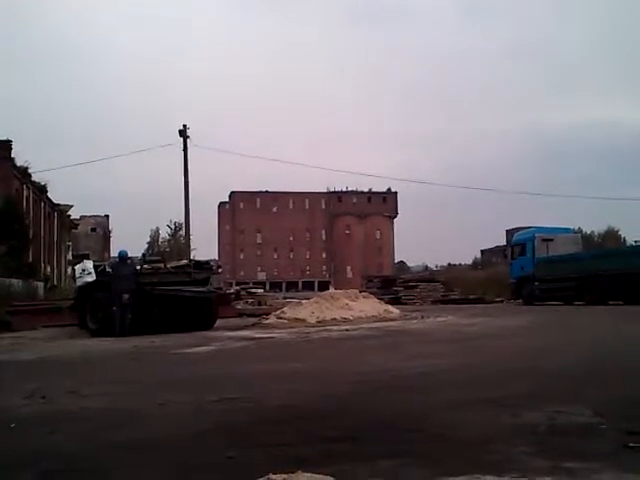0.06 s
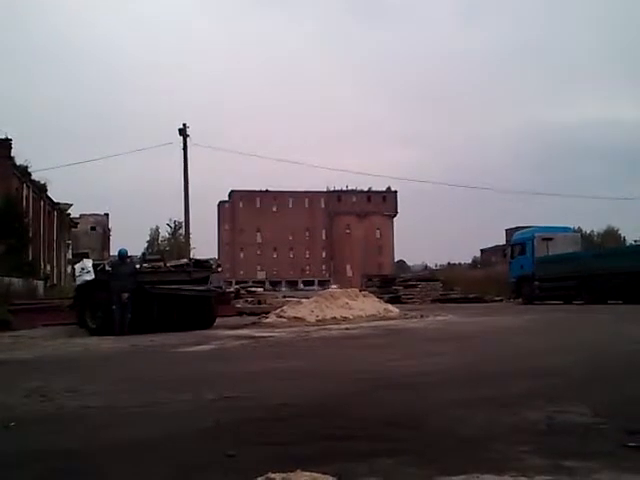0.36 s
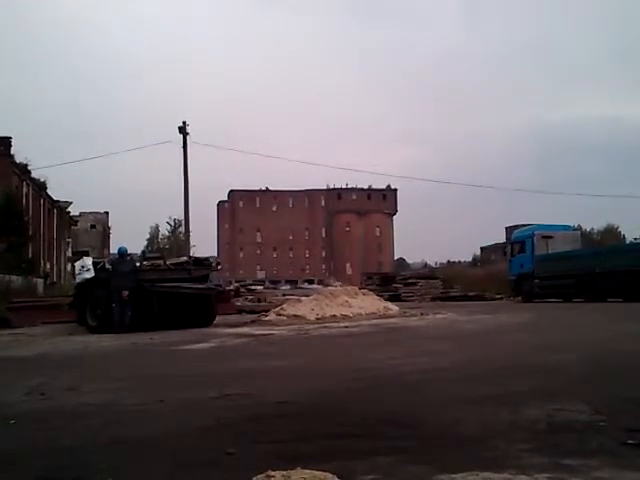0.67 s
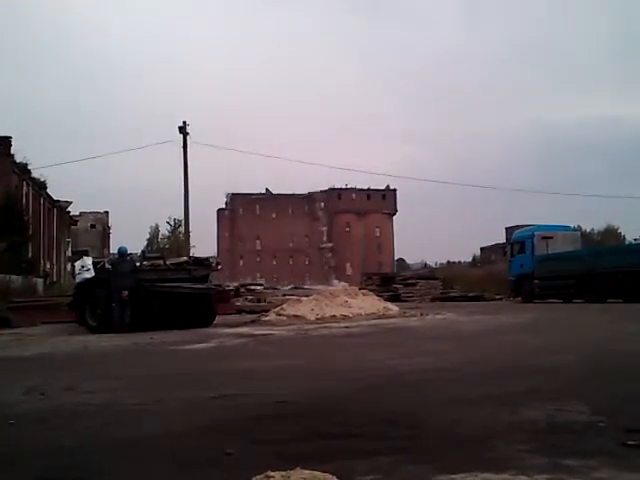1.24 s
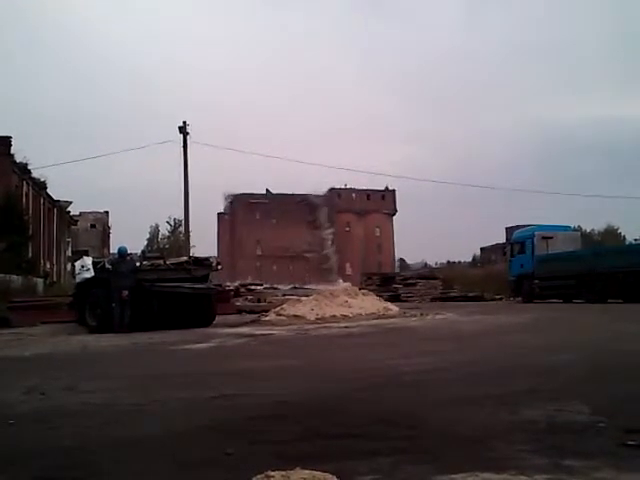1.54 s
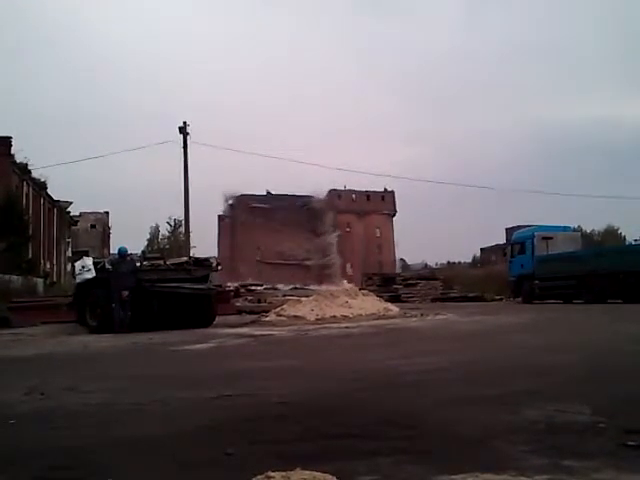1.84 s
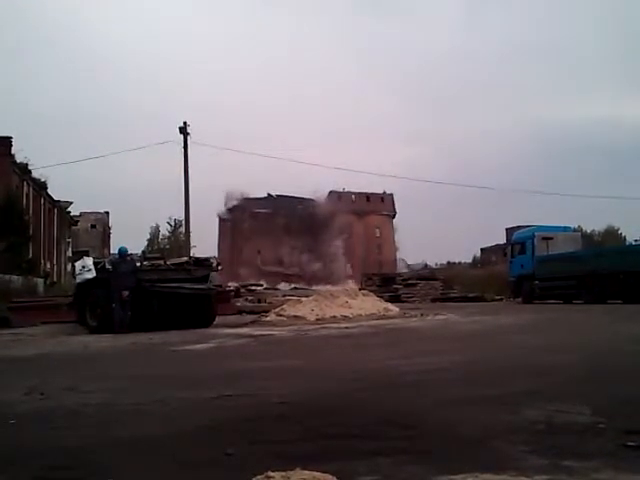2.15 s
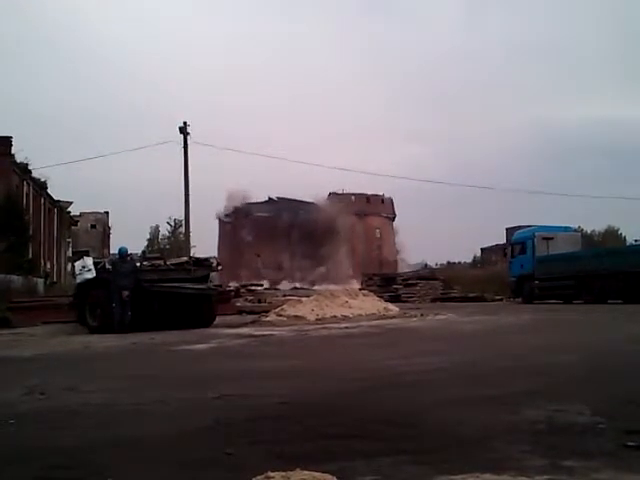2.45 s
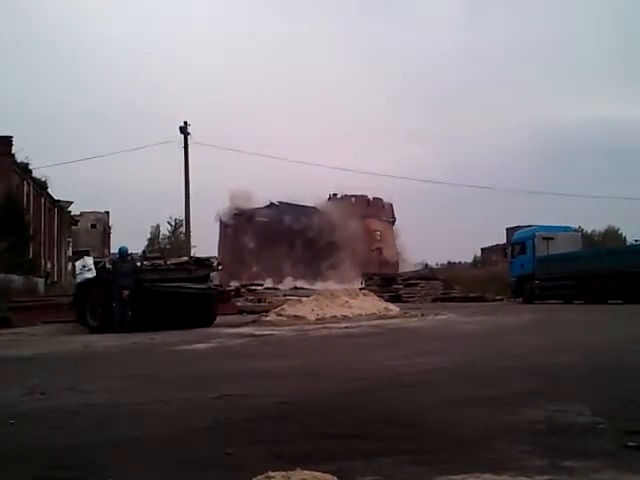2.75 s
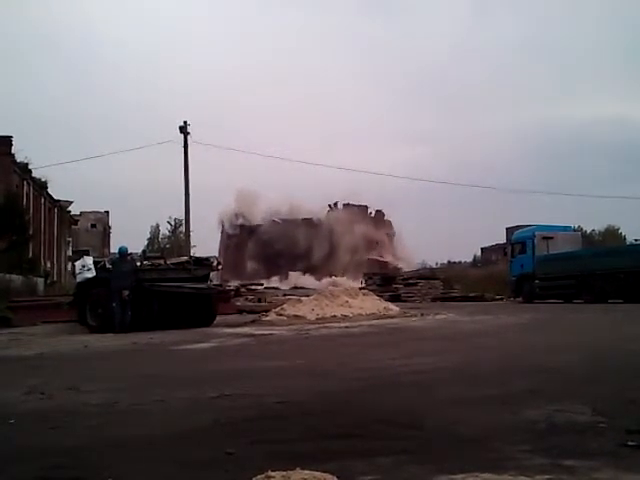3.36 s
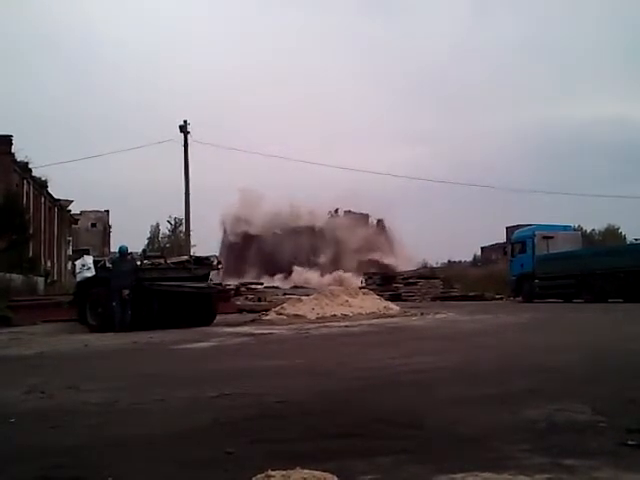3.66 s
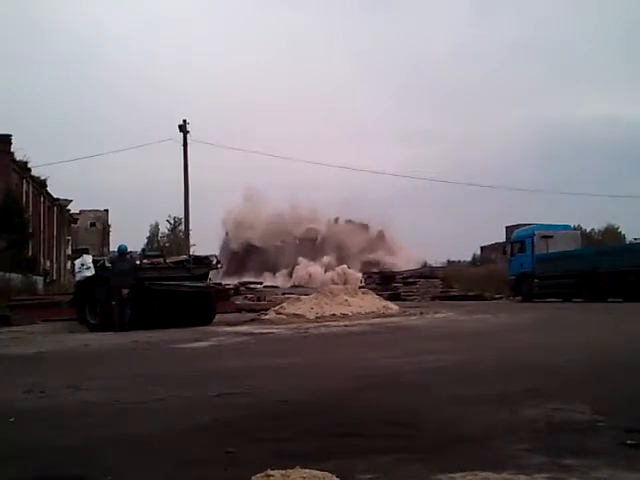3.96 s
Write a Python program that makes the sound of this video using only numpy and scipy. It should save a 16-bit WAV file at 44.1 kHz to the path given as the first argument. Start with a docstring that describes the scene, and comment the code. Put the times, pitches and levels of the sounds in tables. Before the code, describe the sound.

Explosives demolish a brick building in an open yard. Small charges crack and echo, louder blasts boom, then the walls fall with a deep rumble and heavy thumps, giving way to hissing, clattering rubble.

```python
"""Explosives bring down a brick building in an open industrial yard. Small charges crack and echo round
the sheds, two main charges boom, and the masonry falls in a rumble of heavy thumps and a growing hiss
of rubble. Cracks and debris are showers of tiny impacts, booms and thuds are damped low swings, and
echo and rumble are shaped noise. Low air and a hum lie underneath. Two small microphones hear it all
directly and once more off a hard surface close by, ducking on the loudest hits."""
import sys
import numpy as np
from scipy import signal
from scipy.fft import rfft, irfft, next_fast_len
from scipy.io import wavfile
from scipy.ndimage import map_coordinates

SR = 44100
rng = np.random.default_rng(int(sys.argv[2]) if len(sys.argv) > 2 else 0)


def log_audio(samples):
    """Write samples as a 16-bit WAV file to the path given in sys.argv[1]."""
    # one column per channel
    frames = np.atleast_2d(samples).T
    # limit to full scale, then quantise
    limited = np.clip(frames, -1, 1)
    pcm = np.round(limited * 32767).astype(np.int16)
    wavfile.write(sys.argv[1], SR, pcm)


N = 176400

# shocks of the main charges and the first heavy break:
# (time [s], crack [dB], length [s], attack [s], brightness [dB/octave], push [dB], boom [dB])
BLASTS = [(0.953, -18.5, 0.013, 0.0036, 5, -0.5, -21), (0.971, -16.5, 0.0061, 0.0013, 2.5, -7.5, -10.5),
          (1.028, -15, 0.0033, 0.00091, 2.5, -3.5, -8.5), (1.043, -16.5, 0.007, 0.0043, 1.5, -6.5, -8),
          (1.353, -16, 0.0078, 0.0085, -0.9, -6, -9.5)]
# small charges: (time [s], level [dB], length [s], attack [s], brightness [dB/octave])
SMALL_CHARGES = [(0.336, -44.5, 0.05, 0.0017, 3.5), (0.37, -30.5, 0.057, 0.0011, 1),
                 (0.426, -28, 0.0042, 0.0048, 2.5), (0.442, -26, 0.012, 0.0034, 4),
                 (0.456, -17, 0.016, 0.0017, 0.8), (0.521, -19.5, 0.008, 0.0012, 2.3),
                 (0.68, -30, 0.018, 0.011, 2.5), (0.795, -26, .003, 0.00074, -1),
                 (0.844, -29, 0.04, 0.025, 1), (0.921, -26, 0.019, 0.0054, 0.3)]
# tone of a crack: (frequency [Hz], level [dB])
CRACK_EQ = [(40, -10), (180, 5), (330, 9), (550, 2), (1100, 2), (1700, -4.5), (2600, -8), (4300, -14.5),
            (5200, -19), (7300, -29)]
# body of the yard echo: (frequency [Hz], level [dB])
ECHO_BASS_EQ = [(40, -13.5), (190, 6), (330, 2.5), (550, -1.5), (1100, -3.5), (2000, -12.5), (4000, -28.5),
                (6000, -70)]
# bright part of the echo: (frequency [Hz], level [dB])
ECHO_TREBLE_EQ = [(600, -13.5), (1200, 9.5), (2500, 5.5), (4400, 4), (5000, 1.5), (5700, -55),
                  (6500, -63.5)]
# sizzle on top of the echo: (frequency [Hz], level [dB])
ECHO_FIZZ_EQ = [(3500, -32), (5200, 35), (6200, 19.5), (7300, -42)]

# weight of the collapse: (time [s], rumble [dB], thumps [dB])
FALL_FADERS = [(1.0, -20, -12.5), (1.15, -11, -21), (1.3, -16.5, -15), (1.48, -15, -16), (1.7, -16, -14),
               (1.95, -17.5, -16), (2.17, -20.5, -18.5), (2.3, -16, -23.5), (2.42, -24, -23),
               (2.65, -26.5, -29), (3.2, -29, -27.5), (3.75, -28, -28), (4, -33.5, -29.5)]
# breaking masonry: (time [s], level [dB])
CRUSH_FADER = [(1.0, -36), (1.27, -29), (1.38, -22.5), (1.45, -26.5), (1.8, -28), (2.13, -32.5),
               (2.25, -36), (2.8, -39), (3.8, -36), (4, -38)]
# pouring rubble: (time [s], level [dB])
POUR_FADER = [(1.0, -46.5), (1.45, -42), (1.7, -60), (2.0, -47.5), (2.25, -42.5), (2.5, -40), (3.0, -37.5),
              (3.5, -38), (4, -38.5)]
# fine grit: (time [s], level [dB])
GRIT_FADER = [(1.0, -76), (1.75, -99.5), (2.25, -72), (2.47, -50), (2.72, -56.5), (2.97, -47.5),
              (3.5, -56.5), (4, -52)]
# rumble of falling walls: (frequency [Hz], level [dB])
RUMBLE_EQ = [(10, -6.5), (20, 2), (29, 4.5), (42, -3.5), (60, 1), (90, -8.5), (130, -7.5), (300, -111.5)]
# thump of blocks: (frequency [Hz], level [dB])
BLOCK_EQ = [(60, -6.5), (110, -7), (145, -2), (190, -2.5), (240, -5), (310, -12.5), (420, -23.5),
            (900, -105)]
# crunch of bricks: (frequency [Hz], level [dB])
BRICK_EQ = [(150, -19), (330, 3), (560, -4), (800, -6), (1100, -9.5), (1600, -15), (2600, -22),
            (4300, -25.5), (5300, -62.5), (7000, -73.5)]
# hiss of rubble chips: (frequency [Hz], level [dB])
CHIP_EQ = [(200, -15.5), (600, 1), (1100, 0.5), (2000, 2), (2900, 1), (3600, -2), (4450, 0.5), (4900, -4),
           (5600, -15.5), (6300, -46.5)]
# clatter of stones: (frequency [Hz], level [dB])
STONE_EQ = [(500, -21.5), (850, -16), (1050, 6), (1350, -8.5), (1650, 4), (1880, -11), (2060, 4.5),
            (2300, -19), (2520, 6), (2750, -15.5), (3050, 2), (3700, -15), (4250, 0.5), (4800, -23.5),
            (6000, -42)]
# sizzle of grit: (frequency [Hz], level [dB])
GRIT_EQ = [(3500, -29.5), (5000, 6), (5800, 4.5), (6500, 2), (7300, -12.5)]
# buried charges and landing walls: (time [s], level [dB], pitch [Hz])
THUDS = [(0.155, -29.5, 130.4), (0.253, -29, 55), (0.449, -19.5, 61.7), (.468, -22, 201.2),
         (0.691, -23, 162.7), (1.196, -11.5, 206.2), (1.274, -11, 186.7), (1.345, -12, 234.5),
         (1.371, -14, 168.3), (1.403, 1.5, 35.3), (1.493, -7, 178.4), (1.511, -14, 30),
         (1.618, -4.5, 190.3), (1.725, -13.5, 151), (1.889, -12, 143.7), (2.054, -15, 170),
         (2.186, -16, 189.8), (2.285, -9, 48.6), (2.486, -18, 152), (2.731, -20.5, 191),
         (3.629, -20.5, 174.4), (3.74, -20.5, 166.3), (3.82, -23, 147)]
# loads of bricks hitting the heap: (time [s], level [dB], time to peak [s])
SPILLS = [(2.535, -41, 0.017), (2.91, -43, 0.055), (3.125, -38.5, .04), (3.41, -43, 0.038),
          (3.65, -43.5, 0.058), (3.81, -39.5, 0.024)]
# ring of spilling bricks: (frequency [Hz], level [dB])
SPILL_EQ = [(300, -12), (500, -6), (800, -6.5), (1060, 5), (1350, -7.5), (1650, -5), (1880, -18),
            (2080, -3.5), (2350, -19.5), (4300, -18), (6000, -47)]
# modes of a hard struck object: (frequency [Hz], relative level [dB], t60 [s])
KNOCK_MODES = [(1190, 2.5, 0.04), (1270, 5.5, 0.064), (1460, -11, 0.022), (2144, -7.5, 0.03),
               (2400, -7.5, 0.043)]

# ground tremor: (time [s], level [dB])
TREMOR_FADER = [(0, -58), (.11, -57), (.16, -49.5), (.33, -42), (.47, -34.5), (.55, -32.5), (.95, -29.5),
                (1.4, -50.5), (4, -56)]
# tone of the tremor: (frequency [Hz], level [dB])
TREMOR_EQ = [(20, 1), (70, 8.5), (120, 6.5), (180, 7), (260, 5.5), (500, -71)]
# outdoor air: (frequency [Hz], level [dB])
AIR_EQ = [(20, 0.5), (75, 9), (130, -10), (220, -27), (350, -22.5), (650, -28), (900, -31), (2200, -37),
          (4500, -43), (7000, -58.5)]

# diffuse sound against direct: (frequency [Hz], share [dB])
SCATTER_EQ = [(60, -20), (250, -17), (600, -2.5), (1500, -8.5), (4000, -3.5), (7000, -28)]
# reflection off the nearby surface: (frequency [Hz], share [ratio])
BOUNCE_SHARE = [(200, 0.02), (500, 0.32), (900, 0.48), (2300, 0.49), (3300, 0.057), (6000, .1)]
# left microphone port: (frequency [Hz], gain [dB])
LEFT_PORT_EQ = [(60, -3.5), (300, -4), (700, -4.5), (1000, -3.5), (1500, -3), (1750, -4.5), (2000, 1),
                (2250, -3), (2550, 4), (3000, 0.5), (4400, 6.5), (4750, 1), (5500, -2), (6800, -12.5)]
# right microphone port: (frequency [Hz], gain [dB])
RIGHT_PORT_EQ = [(60, 6), (300, 4), (700, 1), (1200, 1), (1950, 2.5), (2170, 5), (2350, -2), (2550, 5),
                 (2950, 1.5), (3700, -2.5), (4600, -3), (5400, 1.5), (6100, -3), (6900, -7)]


def amp(db):
    """Decibels to gain."""
    return 10 ** (np.asarray(db) / 20)


def unit(x):
    """Scale to rms 1."""
    return x / np.sqrt(np.mean(x ** 2) + 1e-20)


def along(points, hz):
    """Read a curve on a log frequency axis."""
    f, v = np.transpose(points)
    return np.interp(np.log(hz + 1), np.log(f + 1), v)


def faders(rows):
    """One value per sample for each column after the time."""
    times, *columns = np.transpose(rows)
    return [np.interp(np.arange(N) / SR, times, column) for column in columns]


def since(start):
    """Seconds since start, zero before it."""
    return np.maximum(np.arange(N) / SR - start, 0)


def wobble(rate):
    """A smooth random curve, rate knots a second."""
    return map_coordinates(rng.standard_normal(2048), [np.arange(N) * rate / SR], mode="wrap")


def filtered(x, response):
    """Filter x by a complex response of frequency."""
    size = next_fast_len(N + SR // 2)
    return irfft(rfft(x, size) * response(np.fft.rfftfreq(size, 1 / SR)), size)[..., :N]


def impacts(per_s, spread_db):
    """Random hits of uneven size, for the direct path and two scattered ones."""
    hits = rng.random((3, N)) < per_s / SR
    polarity = rng.choice([-1, 1], (3, N))
    return hits * polarity * amp(spread_db * np.clip(rng.standard_normal((3, N)), -2, 2))


def coloured(paths, eq, tilt=0):
    """Stereo at rms 1: a shared direct path plus scatter per side; tilt is dB/octave above 500 Hz."""
    shaped = filtered(paths, lambda hz: amp(along(eq, hz) + tilt * np.log2(np.maximum(hz, 500))))
    return unit(shaped[0] + filtered(shaped[1:], lambda hz: amp(along(SCATTER_EQ, hz))))


def noise(eq):
    """Smooth stereo noise with the given tone."""
    return coloured(rng.standard_normal((3, N)), eq)


def pressure_waves():
    """A main charge shoves the air in one slow swing and makes the hollow building boom."""
    push_hz, boom_hz, boom_rise_s, decay_s = 45.3, 176.8, 0.0049, 0.028
    out = np.zeros(N)
    for start, *_, push_db, boom_db in BLASTS:
        t = since(start)
        push = amp(push_db) * np.sin(2 * np.pi * push_hz * t)
        boom = amp(boom_db) * np.sin(2 * np.pi * boom_hz * t) * (1 - np.exp(-t / boom_rise_s))
        out -= (push + boom) * np.exp(-t / decay_s)
    return out


def charge_cracks():
    """Each charge is a short ragged volley of shocks; the yard echoes it, losing the treble first."""
    release_s = 0.017
    send_db, echo_rise_s, decay_db_per_s = -9, 0.014, 16.5
    treble_db, treble_db_per_s, fizz_db, fizz_db_per_s = -6.5, 18, -20.5, 48
    direct = np.zeros((2, N))
    bass_power, treble_power, fizz_power = np.zeros((3, N))
    for start, db, length, attack, tilt, *_ in SMALL_CHARGES + BLASTS:
        t = since(start)
        volley = (1 - np.exp(-t / attack)) * np.exp(-since(start + length) / release_s)
        direct += amp(db) * volley * coloured(impacts(per_s=3100, spread_db=5), CRACK_EQ, tilt)
        fill = np.sqrt(length / 0.016)  # a longer volley fills the yard with more echo
        tail = fill * amp(db + send_db - decay_db_per_s * t) * (1 - np.exp(-t / echo_rise_s))
        bass_power += tail ** 2
        treble_power += (tail * amp(treble_db - treble_db_per_s * t)) ** 2
        fizz_power += (tail * amp(fizz_db - fizz_db_per_s * t)) ** 2
    flutter = amp(1.1 * wobble(41))
    echo = np.sqrt(bass_power) * noise(ECHO_BASS_EQ)
    echo += np.sqrt(treble_power) * noise(ECHO_TREBLE_EQ)
    echo += np.sqrt(fizz_power) * noise(ECHO_FIZZ_EQ)
    return direct + flutter * echo


def collapse():
    """Walls rumble down, blocks thump, bricks break, and chips, stones and grit pour over the heap."""
    rumble_db, thump_db = faders(FALL_FADERS)
    crush_db, = faders(CRUSH_FADER)
    pour_db, = faders(POUR_FADER)
    grit_db, = faders(GRIT_FADER)
    rumble = amp(rumble_db) * noise(RUMBLE_EQ)
    blocks = amp(thump_db - 1) * coloured(impacts(per_s=700, spread_db=4.5), BLOCK_EQ)
    brick_gain = amp(crush_db + 0.5 + 0.24 * wobble(26))
    bricks = brick_gain * coloured(impacts(per_s=1800, spread_db=2.5), BRICK_EQ)
    chip_gain = amp(pour_db + 0.42 * wobble(8.9))
    chips = chip_gain * coloured(impacts(per_s=2500, spread_db=1.5), CHIP_EQ)
    stone_gain = amp(pour_db - 5.5 + 2 * wobble(12))
    stones = stone_gain * coloured(impacts(per_s=230, spread_db=3), STONE_EQ)
    grit = amp(grit_db + 2.2 * wobble(7.8)) * noise(GRIT_EQ)
    fade_in = 1 - np.exp(-since(BLASTS[0][0]) / 0.0074)  # opens on the first main charge
    return fade_in * (rumble + blocks + bricks + chips + stones + grit)


def ground_thuds():
    """A heavy shock comes through the ground as a few low, uneven swings."""
    rise_s, decay_s, rough_rad = 0.007, 0.034, 0.53
    out = np.zeros(N)
    for start, db, hz in THUDS:
        t = since(start)
        swing = np.sin(2 * np.pi * hz * t + rough_rad * wobble(90))
        out -= amp(db) * swing * np.exp(-t / decay_s) * (1 - np.exp(-t / rise_s))
    return out


def brick_spills():
    """Loads of bricks land on the heap: quick swells of clatter, each with a slightly different ring."""
    out = np.zeros((2, N))
    for start, db, peak_s in SPILLS:
        age = since(start) / peak_s
        swell = age * np.exp(1 - age)
        detune = np.exp(0.009 * rng.standard_normal())
        ring_eq = np.array(SPILL_EQ) * [detune, 1]
        out += amp(db) * swell * coloured(impacts(per_s=260, spread_db=1), ring_eq)
    return out


def knock():
    """Something hard is struck once between the charges and rings briefly."""
    level_db, rise_s, rough_rad = -21.5, 0.0011, 1.1
    t = since(0.797)
    ring = np.zeros(N)
    for hz, db, t60 in KNOCK_MODES:
        ring += amp(level_db + db - 60 * t / t60) * np.sin(2 * np.pi * hz * t + rough_rad * wobble(350))
    return ring * (1 - np.exp(-t / rise_s))


def background():
    """A bed of low outdoor air, an engine-like hum, and a ground tremor that swells ahead of the blast."""
    air_db, hum_db, hum_hz = -40, -48.5, 69.8
    tremor_db, = faders(TREMOR_FADER)
    hum = amp(hum_db) * unit(np.sin(2 * np.pi * hum_hz * since(0) + 0.4 * wobble(12)))
    return amp(air_db) * noise(AIR_EQ) + hum + amp(tremor_db) * noise(TREMOR_EQ)


def scene():
    """The whole mix reaches each microphone directly and again off a nearby surface."""
    mix = pressure_waves() + charge_cracks() + knock()
    mix += collapse() + ground_thuds() + brick_spills() + background()
    bounce_s = np.array([[0.002039], [0.001732]])  # left, right
    return filtered(mix, lambda hz: 1 + along(BOUNCE_SHARE, hz) * np.exp(-2j * np.pi * hz * bounce_s))


def gain_control(x):
    """Each channel ducks when it gets loud and recovers slowly."""
    threshold_db, slope, sense_s, recover_db_per_s = -12.5, 0.75, 0.053, 9.5
    pole = np.exp(-1 / (sense_s * SR))
    level_db = 10 * np.log10(signal.lfilter([1 - pole], [1, -pole], x ** 2) + 1e-12)
    over_db = np.maximum(level_db - threshold_db, 0)
    recovery_db = recover_db_per_s * since(0)
    held_db = np.maximum.accumulate(over_db + recovery_db, axis=1) - recovery_db
    return x * amp(-slope * held_db)


def record(dry):
    """Two unequal microphone ports, gain control, soft overload and a steep high cut."""
    right_lag_s, ceiling, high_cut_hz = 0.00013, 0.97, 7450
    lead_s = np.array([[0.5], [-0.5]]) * right_lag_s

    def ports(hz):
        """Each port has its own tone and arrival time."""
        gain = amp([along(LEFT_PORT_EQ, hz), along(RIGHT_PORT_EQ, hz)])
        return gain * np.exp(2j * np.pi * hz * lead_s)

    ducked = gain_control(filtered(dry, ports))
    saturated = ducked / (1 + np.abs(ducked / ceiling) ** 6) ** (1 / 6)
    return filtered(saturated, lambda hz: hz < high_cut_hz)


dry = scene()
out = record(dry)
log_audio(out)
```